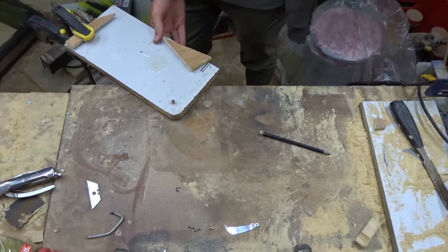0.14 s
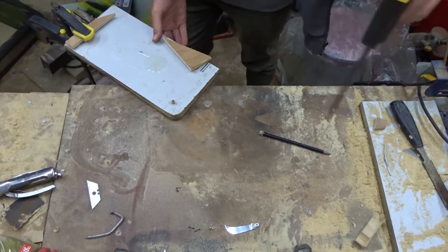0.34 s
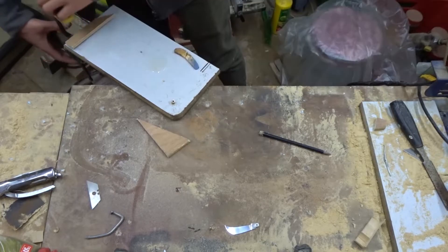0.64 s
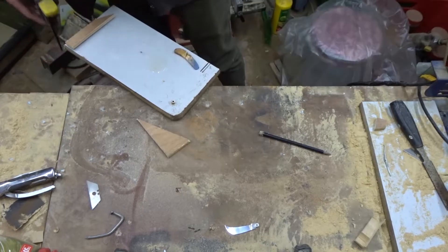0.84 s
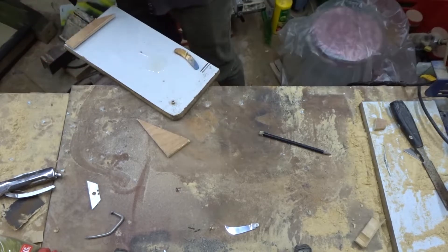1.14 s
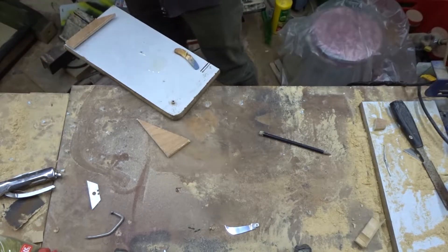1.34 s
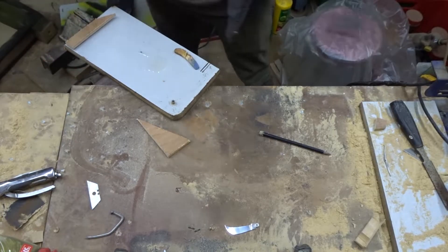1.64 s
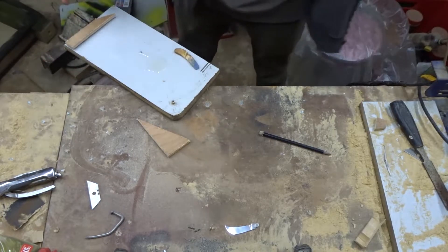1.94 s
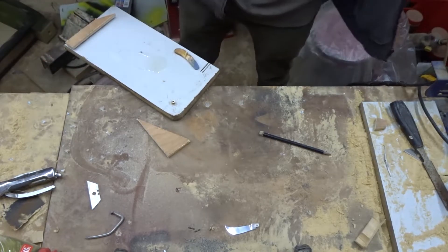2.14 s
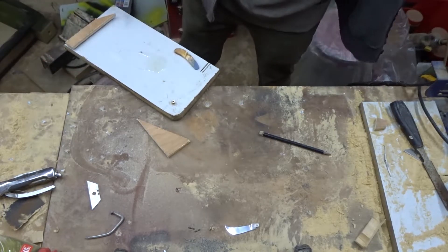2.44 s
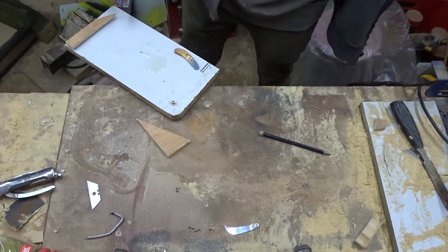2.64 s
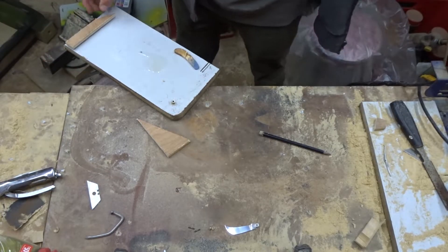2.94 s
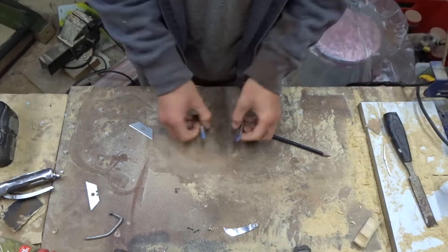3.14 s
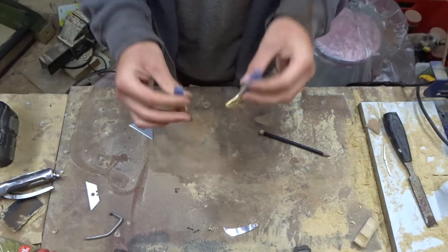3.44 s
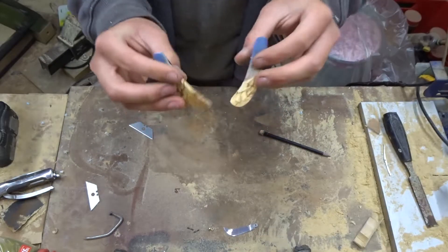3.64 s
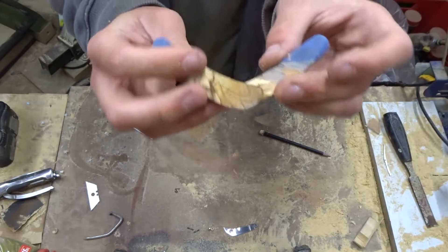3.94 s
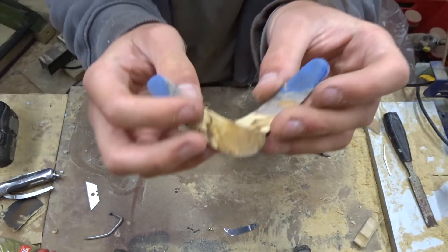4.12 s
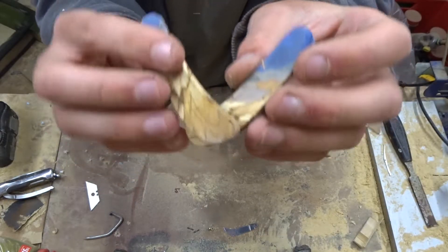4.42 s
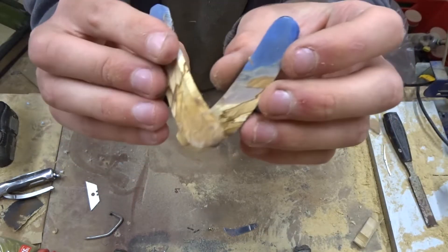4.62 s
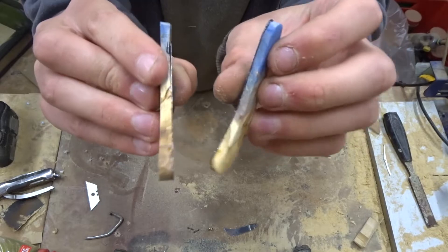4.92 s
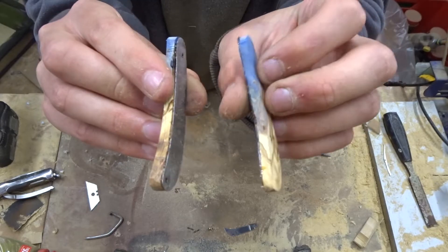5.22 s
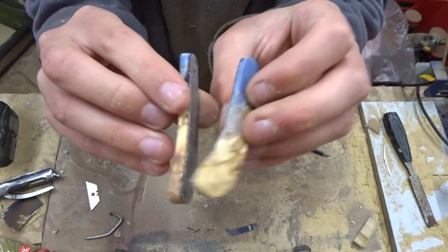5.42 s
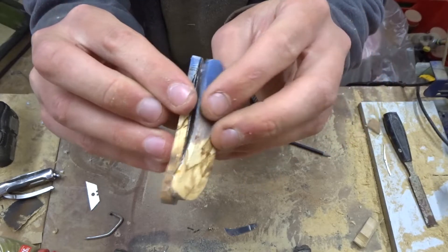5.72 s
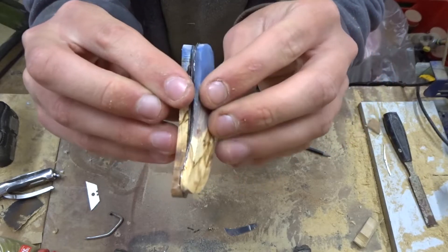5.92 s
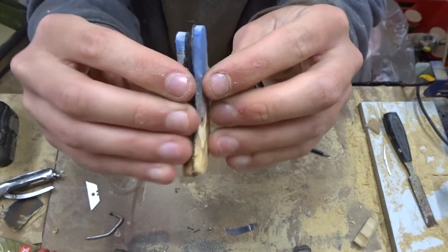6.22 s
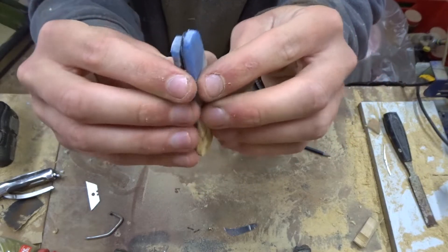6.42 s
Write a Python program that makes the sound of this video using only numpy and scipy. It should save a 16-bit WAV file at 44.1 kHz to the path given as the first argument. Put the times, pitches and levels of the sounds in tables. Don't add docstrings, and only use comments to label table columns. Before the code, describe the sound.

In a small workshop, a clamp lands with a hard clatter, wood slaps and thuds on a bench, then quiet handling and tiny clicks.

```python
import sys
import numpy as np
from scipy import signal
from scipy.fft import rfft, irfft, next_fast_len
from scipy.io import wavfile
from scipy.ndimage import uniform_filter1d

SR = 44100
rng = np.random.default_rng(int(sys.argv[2]) if len(sys.argv) > 2 else 0)


def natural_amplitude(level_db):
    exponent = np.asarray(level_db, float) / 20
    return 10 ** exponent


def store_wav(level_fs):
    pcm = np.round(np.clip(np.atleast_2d(level_fs), -1, 1) * 32767)
    wavfile.write(sys.argv[1], SR, pcm.T.astype(np.int16))


N = 289737
CUT_S = 3.185

# (f/Hz, width/Hz, level/dB)
FLOOR_BODY = ([(15, -51), (25, -38), (91, 5), (226, -8.5), (350, -27), (681, -16), (1200, -18),
               (1900, -88)], [(76, 8.9, 5.5), (110.7, 6.1, 1.5), (159, 21, -3.5), (355, 29, -9)])
# (f/Hz, width/Hz, level/dB)
BUMPED_BODY = ([(180, -20.5), (300, -3), (740, -10), (999, -2), (1120, -14), (1320, -2), (6000, -16.5),
                (9000, -73.5)], [(840, 63, -18), (1300, 35, -7)])
# (f/Hz, width/Hz, level/dB)
CLAMP_BODY = ([(200, -39.5), (800, -8), (1370, -8), (2830, -3.5), (7140, -14.5), (11000, -22)],
               [(1010, 76, -4), (1909, 180, -2), (2230, 24, -4), (2720, 57, 0.5), (3000, 88, -8.5),
               (4030, 95, -5), (4460, 75, -10), (5230, 43, -15.5), (5870, 96, -13.5), (7600, 39, -13)])
# (f/Hz, width/Hz, level/dB)
FACE_BODY = ([(880, -45), (1500, -8), (1860, -1), (4590, 0), (10000, -7)], [(3970, 71, 2.4),
              (4430, 44, 2.5)])


def evened(x):
    return x / np.sqrt(np.mean(x ** 2) + 1e-20)


def read(points, hz):
    f, value = np.transpose(points)
    return np.interp(np.log(hz + 1), np.log(f + 1), value)


def add(mix, s, sound):
    part = mix[:, round(s * SR):][:, :sound.shape[1]]
    part += sound[:, :part.shape[1]]


def response(body, ring_db, loss=0.19):
    colour, modes = body
    hz = np.fft.rfftfreq(16384, 1 / SR)
    power = natural_amplitude(read(colour, hz)) ** 2
    for f, width, db in modes:
        offset = 2 * (hz - f) / max(width, loss * f)
        power = power + natural_amplitude(db + ring_db) ** 2 / (1 + offset ** 2) ** 1.6
    log_gain = np.log(power + 1e-12) / 2
    mirrored = np.r_[log_gain, log_gain[-2:0:-1]]
    phase = -signal.hilbert(mirrored).imag[:len(hz)]
    taps = irfft(np.exp(log_gain + 1j * phase))[:8000]
    return taps / np.linalg.norm(taps)


def contacts(count, per_s, spread_db, grit):
    chance, size = rng.random(count), rng.exponential(1, count)
    sign, noise = np.sign(rng.random(count) - 0.5), rng.standard_normal(count)
    clicks = (chance < per_s / SR) * natural_amplitude(spread_db * np.minimum(size, 3)) * sign
    return evened(evened(clicks) + grit * noise)


def knocks(events, body, ring_db, per_s, blow, grit, contact_ms, soften=0.091, pan_db=0, wander_db=0,
           lag_samples=0, loss=0.084, rise_ms=0.029, detune=0):
    taps = response(body, ring_db, loss)
    out = np.zeros((2, N))
    t = np.arange(13000) / SR
    hardest_db = max(row[1] for row in events)
    for s, db, t60 in events:
        fade = natural_amplitude(-60 * t / np.clip(t60, 0.003, 0.3))
        fade *= np.minimum(1000 * t / max(rise_ms, 0.01), 1)
        drive = contacts(len(t), per_s, 1.4, grit) * fade
        drive *= np.linalg.norm(fade) / np.linalg.norm(drive)
        drive[0] += blow
        touch_ms = max(contact_ms, 0.01) * natural_amplitude(soften * (hardest_db - db))
        touch = signal.butter(2, min(500 / touch_ms, SR / 2.2), fs=SR)
        drive = signal.lfilter(*touch, drive)
        corner = rng.standard_normal()
        at = np.arange(len(taps))
        ring = np.interp(at * (1 + detune * corner), at, taps)
        sound = signal.fftconvolve(drive, ring) * natural_amplitude(db - 9.5)
        side_db = pan_db + wander_db * corner
        add(out, s, sound * evened(natural_amplitude(np.array([[side_db / 2], [-side_db / 2]]))))
    size = next_fast_len(N)
    delay = np.exp(-1j * np.pi * np.fft.rfftfreq(size) * lag_samples)
    return irfft(rfft(out, size) * [delay, 1 / delay], size)[:, :N]


def pressure(strokes):
    t = np.arange(N) / SR
    total = np.zeros(N)
    for s, db, rise, hold, fall in strokes:
        ahead = np.maximum(s - t, 0) / max(rise, 0.001)
        past = np.maximum(t - s - hold, 0) / max(fall, 0.001)
        total += natural_amplitude(db - 30 * (ahead + past))
    return total


def rubbing(strokes, body, ring_db, per_s, grit, spread_db=9.5, loss=0.19):
    drive = contacts(N, per_s, spread_db, grit) * pressure(strokes)
    return np.tile(signal.oaconvolve(drive, response(body, ring_db, loss))[:N], (2, 1))


def shop(x, wet_db):
    # f/Hz, t60/s
    decay = [(100, 0.57), (500, 0.26), (2000, 0.22), (5000, 0.18), (10000, 0.12)]
    taps = np.zeros((2, SR // 2))
    at = np.arange(60, SR // 2 - 20, 20)
    at = at + rng.integers(0, 20, (2, len(at)))
    np.put_along_axis(taps, at, rng.choice([-1., 1.], at.shape), 1)
    hz, t, z = signal.stft(taps, SR, nperseg=256)
    tail = signal.istft(z * natural_amplitude(-60 * t / read(decay, hz)[:, None]), SR, nperseg=256)[1]
    tail = tail / np.linalg.norm(tail[0])
    wet = natural_amplitude(wet_db) * signal.fftconvolve(x, tail, axes=1)[:, :N]
    side = 0
    for part, edge_hz, db in ((x, 1300, -0.5), (wet, 1500, 3.5)):
        high = signal.butter(1, edge_hz, "high", fs=SR)
        side = side + natural_amplitude(db) * signal.lfilter(*high, part[0] - part[1]) / 2
    return (x + wet).mean(0) + np.array([side, -side])


def hush(colour, db):
    # f/Hz, correlation/1
    likeness = [(60, 0.94), (170, 0.89), (480, 0.31), (1360, -0.01), (3860, -0.0052), (10900, -0.13)]
    frames, hz = N // 256 + 5, np.fft.rfftfreq(1024, 1 / SR)
    a, b, c, d, patches = rng.standard_normal((frames, 513, 5)).T
    patches = evened(uniform_filter1d(uniform_filter1d(patches, 12, 0), 20, 1))
    same = np.clip(read(likeness, hz), -1, 1)[:, None]
    left = a + 1j * b
    z = np.array([left, same * left + np.sqrt(1 - same ** 2) * (c + 1j * d)])
    z *= natural_amplitude(read(colour, hz)[:, None] + 1.3 * patches)
    return natural_amplitude(db) * evened(signal.istft(z, nperseg=1024, noverlap=768)[1][:, :N])


def hush_before():
    # f/Hz, level/dB per Hz
    colour_before = [(35, -25.5), (60, -3), (196, -9.5), (394, -9), (1280, -16), (1600, -14), (3440, -18),
                     (10500, -26), (11200, -33.5)]
    return hush(colour_before, -62.5)


def hush_after():
    # f/Hz, level/dB per Hz
    colour_after = [(20, -2.5), (69, -4), (115, -14.5), (398, -9), (577, -14), (1150, -18), (1460, -13.5),
                    (2750, -19), (4670, -20), (11200, -29)]
    stir_db = 4 * np.exp(-abs(np.arange(N) / SR - CUT_S) / 0.5)
    return hush(colour_after, -64.5) * natural_amplitude(stir_db)


def tripod_sway():
    # t/s, level/dB, rise/s, hold/s, fall/s
    sways = [
        (0.001, -64.5, 0.11, 0.026, 0.31),
        (0.51, -59, 0.23, 0.028, 0.79),
        (1.61, -62, 0.19, 0.093, 0.28),
        (2.31, -62, 0.063, 0.34, 0.68),
        (2.76, -52.5, 0.49, 0.036, 1),
    ]
    # (f/Hz, width/Hz, level/dB)
    tripod = ([(12, -19.5), (30, -1), (60, 1), (85, -1), (150, -34), (400, -81)], [(48, 18, -1.5)])
    return rubbing(sways, tripod, ring_db=-5.5, per_s=570, grit=2.7)


def footsteps():
    # t/s, level/dB, t60/s
    soles = [
        (1.546, -36.5, 0.24),
        (1.612, -42, 0.061),
        (1.635, -48, 0.073),
        (1.656, -34, 0.083),
        (1.689, -38, 0.14),
        (1.746, -55, 0.12),
    ]
    # t/s, level/dB, t60/s
    heels = [
        (1.545, -39, 0.052),
        (1.575, -46, 0.095),
    ]
    # (f/Hz, width/Hz, level/dB)
    heel_body = ([(30, -31), (90, 0), (250, -4), (380, -7), (600, -29), (1500, -63)], [(286, 56, 2.4)])
    steps = knocks(soles, FLOOR_BODY, ring_db=6.0, per_s=200, blow=20, grit=0.32, contact_ms=0.99)
    return steps + knocks(heels, heel_body, ring_db=1.5, per_s=360, blow=12.0, grit=0.39, contact_ms=1.36)


def shoe_scuffs():
    # t/s, level/dB, rise/s, hold/s, fall/s
    scuffs = [
        (1.66, -64, 0.23, 0.017, 0.2),
        (2.034, -67, 0.2, 0.032, 0.042),
    ]
    return rubbing(scuffs, BUMPED_BODY, ring_db=-11, per_s=3000, grit=0.56)


def weight_shifts():
    # t/s, level/dB, rise/s, hold/s, fall/s
    shifts = [
        (4.3, -72, 0.15, 0.011, 0.11),
        (4.43, -70, 0.11, 0.13, 0.084),
    ]
    return rubbing(shifts, FLOOR_BODY, ring_db=3, per_s=220, grit=0.35)


def bench_frame():
    # t/s, level/dB, t60/s
    thumps = [
        (2.434, -15, 0.04),
        (2.5, -27.5, 0.1),
        (2.57, -29.5, 0.13),
        (2.8, -32, 0.19),
        (2.94, -17, 0.038),
        (2.998, -31, 0.27),
        (3.089, -25.5, 0.04),
        (3.15, -36, 0.094),
    ]
    # t/s, level/dB, rise/s, hold/s, fall/s
    shakes = [
        (0.44, -55, 0.02, 0.077, 0.39),
        (1.3, -62.5, 0.15, 0.047, 0.13),
        (1.872, -64.5, 0.028, 0.0054, 1),
        (2.26, -32.5, 0.0093, 0.12, 0.15),
        (2.4, -46, 0.028, 0.033, 0.63),
        (2.72, -44, 0.067, 0.072, 0.15),
        (2.868, -32.5, 0.014, 0.014, 0.091),
        (2.93, -50, 0.069, 0.047, 0.89),
    ]
    # (f/Hz, width/Hz, level/dB)
    bench_body = ([(35, -32.5), (60, -5.5), (103, 2.5), (162, -10.5), (334, -3), (518, -8.5), (709, -13.5),
                   (1200, -24), (1900, -78)], [(107, 15, -0.5), (186, 25, -9.5), (310, 21, -5.5),
                   (349.5, 15, -2), (570, 9.7, -15.5), (657, 30, -16.5), (743, 35, -17.5)])
    thuds = knocks(thumps, bench_body, ring_db=4.0, per_s=1100, blow=7.2, grit=0.7, contact_ms=3.2)
    return thuds + rubbing(shakes, bench_body, ring_db=7.5, per_s=1600, grit=1.3, spread_db=4.5, loss=0.07)


def block_knock():
    # t/s, level/dB, t60/s
    block_blows = [
        (0.4245, -31, 0.084),
        (0.435, -27.5, 0.031),
        (0.4385, -31, 0.05),
        (0.445, -35, 0.063),
        (0.451, -32, 0.089),
        (0.459, -37, 0.06),
        (0.4635, -38, 0.046),
        (0.469, -35, 0.019),
        (0.476, -38, 0.097),
    ]
    # (f/Hz, width/Hz, level/dB)
    block = ([(100, -4.5), (429, -8), (715, -0.5), (870, 3.5), (2070, -1), (3960, -1), (11000, -20)],
              [(500, 26, 10), (857, 79, 7), (1250, 81, 3.5), (2240, 60, -10), (3200, 90, -2),
              (3590, 120, 2), (3930, 150, 5.5), (5350, 120, -6.5)])
    return knocks(block_blows, block, loss=0.048, ring_db=4.5, detune=0.006, rise_ms=0.35, per_s=3200,
                  blow=2.2, grit=0.85, contact_ms=0.022, soften=0.3, pan_db=-0.5, lag_samples=-0.9)


def clamp_skid():
    # t/s, level/dB, t60/s
    hops = [
        (0.866, -45.5, 0.06),
        (0.8745, -28.5, 0.019),
        (0.8775, -25, 0.03),
        (0.893, -33, 0.14),
        (0.91, -35, 0.17),
        (0.931, -27, 0.084),
        (0.938, -27.5, 0.13),
        (0.954, -26.5, 0.18),
        (0.9745, -23.5, 0.067),
    ]
    # (f/Hz, width/Hz, level/dB)
    skid_body = ([(200, -29), (600, -8.5), (1000, -4), (1500, -8), (2300, -5), (4200, -7), (7140, -16.5),
                  (11000, -22.5)], [(1000, 81, -0.5), (1730, 120, -3.5), (2300, 100, 0), (3356, 60, 1),
                  (4050, 120, -4.5), (4760, 80, -8), (5557, 80, -10.5)])
    return knocks(hops, skid_body, loss=0.04, ring_db=1.5, detune=0.013, rise_ms=1.5, per_s=4000,
                  blow=1.2, grit=1.0, contact_ms=0.068, soften=0.15, pan_db=2.0, lag_samples=-2.5)


def clamp_drag():
    # t/s, level/dB, rise/s, hold/s, fall/s
    drags = [
        (0.878, -59, 0.02, 0.03, 0.2),
        (0.98, -37, 0.12, 0.0046, 0.013),
        (1.15, -61, 0.078, 0.15, 0.05),
        (2.694, -58, 0.29, 0.0047, 0.036),
    ]
    return rubbing(drags, CLAMP_BODY, ring_db=-9.5, per_s=9600, grit=0.98)


def clamp_landing():
    # t/s, level/dB, t60/s
    clamp_blows = [(0.9845, -13, 0.03), (0.9875, -10, 0.025), (0.9918, -0.5, 0.016), (0.998, -4.5, 0.025),
                   (1.001, -6, 0.025), (1.009, -7, 0.018), (1.0125, -10, 0.02), (1.0168, -6.5, 0.028),
                   (1.024, -10.5, 0.016), (1.029, -10.5, 0.037), (1.0355, -13.5, 0.045),
                   (1.04, -21.5, 0.04), (1.046, -18, 0.021), (1.053, -30.5, 0.044), (1.066, -43, 0.023)]
    return knocks(clamp_blows, CLAMP_BODY, loss=0.066, ring_db=2.5, detune=0.037, rise_ms=0.15, per_s=2700,
                  blow=1.7, grit=0.78, contact_ms=0.023, soften=0.32, pan_db=0.5, lag_samples=-1.67)


def clamp_closing():
    # t/s, level/dB, t60/s
    jaw_blows = [
        (1.271, -27, 0.025),
        (1.2755, -23.5, 0.033),
        (1.2828, -39, 0.033),
        (1.2915, -24.5, 0.068),
        (1.2995, -27, 0.04),
        (1.305, -29, 0.024),
    ]
    # (f/Hz, width/Hz, level/dB)
    jaw_body = ([(800, -12), (1700, -23), (2300, -9), (3050, -1.5), (4480, -7), (5500, -13.5),
                 (11000, 0.5)], [(2900, 150, -2), (3350, 150, -1), (4200, 120, -10), (5000, 60, 0)])
    # t/s, level/dB, t60/s
    snaps = [
        (1.33, -33.5, 0.025),
        (1.3328, -29.5, 0.018),
        (1.338, -41.5, 0.042),
        (1.343, -45, 0.034),
        (1.349, -38.5, 0.081),
    ]
    # (f/Hz, width/Hz, level/dB)
    snap_body = ([(200, -8), (900, -7), (1500, -10), (2500, 1.5), (4000, -5.5), (6000, -14), (11000, -9)],
                  [(960, 180, 4.5), (2300, 200, -5), (3300, 250, -2), (5200, 250, -5)])
    jaws = knocks(jaw_blows, jaw_body, ring_db=-7.0, per_s=2300, blow=1.5, grit=0.87, contact_ms=0.067,
                  pan_db=0.5, lag_samples=-1.84)
    return jaws + knocks(snaps, snap_body, ring_db=-0.5, per_s=2200, blow=1.7, grit=0.78, contact_ms=0.047,
                         pan_db=1.0, lag_samples=-1.5)


def board_drop():
    # t/s, level/dB, t60/s
    board_blows = [(2.257, -13, 0.02), (2.2602, -6.5, 0.04), (2.266, -8.5, 0.032), (2.2725, -7.5, 0.018),
                   (2.279, -4, 0.022), (2.2835, -8, 0.02), (2.2865, -11, 0.017), (2.2975, -13, 0.013),
                   (2.3008, -6, 0.024), (2.306, -18, 0.033), (2.3155, -19, 0.025), (2.3215, -15.5, 0.021),
                   (2.327, -15.5, 0.033), (2.3415, -11, 0.013), (2.3442, -4.5, 0.013),
                   (2.3565, -13.5, 0.016)]
    # (f/Hz, width/Hz, level/dB)
    board = ([(59, -45.5), (100, -9), (1120, -5), (2150, -5), (4300, -17.5), (11000, -29.5)],
              [(434, 54, -2.5), (786, 19.1, 4.5), (1248, 41, 5), (1337, 83, 1.5), (1720, 56, -7.5),
              (1830, 41, -14.5), (2530, 106, 2.5), (2596, 150, -3), (2798, 85, -6.5), (3440, 67, -10.5),
              (3704, 110, -9), (5053, 77, -21.5)])
    # t/s, level/dB, t60/s
    settling = [(2.289, -13.5, 0.3), (2.31, -19.5, 0.27), (2.337, -8.5, 0.038), (2.348, -16, 0.065),
                (2.367, -16, 0.023), (2.373, -16, 0.027), (2.381, -33, 0.036), (2.387, -24.5, 0.043),
                (2.399, -32, 0.057), (2.404, -36, 0.04), (2.411, -32, 0.051), (2.439, -41, 0.43)]
    # (f/Hz, width/Hz, level/dB)
    lying_board = ([(59, -13), (100, -11.5), (145, -14), (388, -4), (564, -2.5), (923, -5.5), (2670, -11.5),
                    (11000, -32)], [(355, 15, 4), (558, 16, 5), (1193, 59, -12), (1790, 120, -13.5),
                    (2448, 100, -2.5), (2700, 60, -8)])
    drop = knocks(board_blows, board, loss=0.016, ring_db=7.5, detune=0.003, rise_ms=0.41, per_s=2800,
                  blow=4, grit=0.94, contact_ms=0.046, pan_db=-6.0, wander_db=5, lag_samples=1.4)
    return drop + knocks(settling, lying_board, loss=0.026, ring_db=-1.5, detune=0.011, rise_ms=1.5,
                         per_s=1400, blow=3.4, grit=0.58, contact_ms=0.045, pan_db=-4.5, wander_db=7,
                         lag_samples=2.1)


def offcut_drop():
    # t/s, level/dB, t60/s
    offcut_blows = [(1.864, -43, 0.067), (1.868, -40.5, 0.095), (1.889, -39.5, 0.16), (2.703, -27, 0.036),
                    (2.7102, -21, 0.025), (2.7132, -19, 0.024), (2.717, -18, 0.023), (2.7225, -36.5, 0.069),
                    (2.7295, -23, 0.036), (2.735, -26.5, 0.055), (2.7425, -28.5, 0.078)]
    # (f/Hz, width/Hz, level/dB)
    offcut = ([(60, -35), (120, -5), (250, 0.5), (500, -1), (1200, -6), (2200, -10.5), (3200, -18.5),
               (4200, -25), (11000, -22)], [(205.5, 38, -8), (283, 40, 3.5), (347, 34, -2.5),
               (569.4, 18, -5.5), (1080, 51, -5.5), (1207, 43, -10.5), (1640, 79, -17), (2540, 90, -16)])
    # t/s, level/dB, t60/s
    flops = [
        (2.7535, -31, 0.034),
        (2.7585, -25, 0.053),
        (2.7705, -31, 0.055),
        (2.779, -25.5, 0.065),
        (2.7875, -35, 0.057),
        (2.798, -34, 0.07),
        (2.81, -41, 0.084),
    ]
    # (f/Hz, width/Hz, level/dB)
    flat_offcut = ([(60, -20), (120, -18), (220, -24), (400, 0.5), (900, -1.5), (1300, -14), (2200, -17),
                    (4200, -23), (11000, -23)], [(330, 37, -6), (860, 60, -7), (1230, 80, -11),
                    (2100, 120, -15)])
    drop = knocks(offcut_blows, offcut, loss=0.053, ring_db=5.5, detune=0.026, rise_ms=0.46, per_s=2200,
                  blow=6.6, grit=1.0, contact_ms=0.1, soften=0.081, pan_db=-5.0, lag_samples=2.1)
    return drop + knocks(flops, flat_offcut, ring_db=5.0, detune=0.02, rise_ms=2.5, per_s=5200, blow=0.8,
                         grit=1.0, contact_ms=0.15, lag_samples=0.96)


def handle_drop():
    # t/s, level/dB, t60/s
    handle_blows = [
        (2.8652, -11, 0.013),
        (2.8692, -9.5, 0.023),
        (2.877, -12, 0.032),
        (2.8855, -25, 0.03),
        (2.8895, -22, 0.038),
        (2.901, -22.5, 0.053),
        (2.907, -21, 0.022),
        (2.9135, -35, 0.047),
        (2.9215, -31.5, 0.11),
    ]
    # (f/Hz, width/Hz, level/dB)
    handle = ([(59, -21), (100, -9), (157, -7.5), (388, 1.5), (482, -15), (729, -6), (1040, -5.5),
               (3380, -8), (11000, -33.5)], [(344, 17, 7.5), (397.5, 23, 8.5), (667, 33, 8.5), (706, 22, 1),
               (2590, 90, -5.5), (2840, 99, 2.5), (3170, 90, -9), (3470, 230, 4), (4040, 160, -5.5),
               (5400, 220, -15)])
    return knocks(handle_blows, handle, loss=0.051, ring_db=2.5, detune=0.039, rise_ms=0.25, per_s=2600,
                  blow=2.3, grit=0.56, contact_ms=0.026, pan_db=-2.5, wander_db=3.0, lag_samples=2.0)


def bench_bumps():
    # t/s, level/dB, t60/s
    bumps = [
        (4.084, -55.5, 0.089),
        (4.109, -54.5, 0.12),
        (4.42, -51, 0.068),
        (4.431, -48, 0.075),
        (4.451, -51, 0.072),
    ]
    # t/s, level/dB, t60/s
    nudges = [
        (4.472, -53, 0.045),
        (4.48, -44.5, 0.047),
        (4.493, -50, 0.11),
    ]
    # (f/Hz, width/Hz, level/dB)
    nudged_body = ([(180, -24), (400, -1), (1100, -14), (2500, -15), (6000, -35), (9000, -61)],
                    [(620, 29, 1), (856, 58, -9), (1280, 28, 0.5), (2470, 83, -15)])
    bumped = knocks(bumps, BUMPED_BODY, ring_db=-3.5, per_s=1400, blow=0.38, grit=0.8, contact_ms=0.18,
                    lag_samples=1.36)
    return bumped + knocks(nudges, nudged_body, loss=0.041, ring_db=3, per_s=3000, blow=1.6, grit=0.68,
                           contact_ms=0.18, lag_samples=1.4)


def finger_strokes():
    # t/s, level/dB, rise/s, hold/s, fall/s
    brushes = [
        (0.21, -74, 0.038, 0.11, 0.03),
        (1.37, -76, 0.05, 0.037, 0.33),
    ]
    return rubbing(brushes, FACE_BODY, ring_db=4.0, per_s=3600, grit=0.74)


def slab_slide():
    # t/s, level/dB, rise/s, hold/s, fall/s
    slides = [
        (3.186, -68, 0.00091, 0.0043, 0.072),
        (3.187, -61.5, 0.0014, 0.14, 0.29),
    ]
    # (f/Hz, width/Hz, level/dB)
    sliding_body = ([(120, -30.5), (200, 1.5), (556, -1), (832, -7), (1090, -6.5), (1960, 0.5), (2390, -7),
                     (11000, -11.5)], [(547, 140, -2), (823, 62, -2.5), (2000, 280, -4), (2670, 270, -8),
                     (4710, 670, -8), (8600, 600, -19.5)])
    return rubbing(slides, sliding_body, ring_db=8.0, per_s=3700, grit=1.8)


def slab_faces():
    # t/s, level/dB, rise/s, hold/s, fall/s
    face_strokes = [
        (5.21, -90, 0.051, 0.4, 0.12),
        (5.64, -82, 0.24, 0.406, 0.054),
    ]
    # t/s, f/Hz, level/dB, hold/s
    squeaks = [
        (5.72, 4430, -88, 0.3),
        (5.87, 3700, -82, 0.17),
    ]
    waver, flicker = (evened(row) for row in uniform_filter1d(rng.standard_normal((2, N)), 1500))
    tones = np.zeros(N)
    for s, hz, db, hold in squeaks:
        phase = 2 * np.pi * np.cumsum(hz * (1 + 0.00105 * waver)) / SR
        tones += np.sin(phase) * pressure([(s, db, 0.12, hold, 0.055)])
    rub = rubbing(face_strokes, FACE_BODY, ring_db=9.0, per_s=1500, grit=1.0)
    return rub + np.tile(tones * natural_amplitude(2.6 * flicker), (2, 1))


def slab_ticks():
    # t/s, level/dB, t60/s
    touches = [
        (5.4945, -34.5, 0.012),
        (5.7584, -40, 0.03),
    ]
    # (f/Hz, width/Hz, level/dB)
    touched_body = ([(800, -10.5), (2200, -4), (3710, -4), (4830, -1), (6720, -16.5), (11000, -8)],
                     [(1500, 135, 0.5), (2294, 200, 1.5), (2710, 164, 2)])
    # t/s, level/dB, t60/s
    ticks = [
        (6.2762, -22.5, 0.007),
        (6.2825, -53, 0.05),
        (6.292, -45, 0.22),
    ]
    # (f/Hz, width/Hz, level/dB)
    slabs = ([(500, -31), (1390, -14), (2180, -17.5), (2870, -7), (5400, -6.5), (7370, -0.5), (8280, -13),
              (11000, -4.5)], [(1450, 110, -5), (2910, 320, 5.5), (3650, 460, 6), (5870, 220, -3),
              (6800, 400, -9), (7600, 450, -1), (10200, 430, 2)])
    # t/s, level/dB, t60/s
    clinks = [
        (6.552, -39, 0.01),
        (6.5535, -40.5, 0.0091),
        (6.555, -31.5, 0.005),
    ]
    # (f/Hz, width/Hz, level/dB)
    edge_body = ([(800, -20), (2000, -10.5), (5000, -11), (8500, -12), (11000, -16.5)], [(2400, 210, -3),
                  (4700, 250, -11.5), (7230, 1300, 3), (10900, 330, -5)])
    sound = knocks(touches, touched_body, ring_db=3.5, per_s=3080, blow=4.2, grit=0.32, contact_ms=0.063,
                   soften=1.4, pan_db=-4.0, lag_samples=0.67)
    sound += knocks(ticks, slabs, loss=0.04, ring_db=-1.0, per_s=4300, blow=5.1, grit=0.56,
                    contact_ms=0.024, soften=0.089, pan_db=-2.0, lag_samples=0.8)
    sound += knocks(clinks, edge_body, ring_db=-2.5, per_s=9000, blow=2.0, grit=0.8, contact_ms=0.05,
                    pan_db=-1.5, lag_samples=0.9)
    return sound


def scene():
    clamp_side = block_knock() + clamp_skid() + clamp_landing() + clamp_closing()
    clamp_side += clamp_drag() + shoe_scuffs()
    board_side = board_drop() + offcut_drop() + handle_drop()
    shaking = bench_frame() + footsteps() + tripod_sway()
    first = shop(clamp_side, wet_db=-3.5) + shop(board_side, wet_db=-6.0) + shaking + hush_before()

    close = slab_ticks() + bench_bumps()
    second = shop(close, wet_db=-9) + hush_after() + weight_shifts()

    strokes = slab_slide() + finger_strokes() + slab_faces()
    before = np.arange(N) < CUT_S * SR
    return np.where(before, first, second) + natural_amplitude(6.5) * shop(strokes, wet_db=-1.5)


def low_pass(x):
    return signal.sosfilt(signal.butter(12, 11520, fs=SR, output="sos"), x)


def record(dry):
    edge = signal.firwin(1023, 11150, window=("kaiser", 9), fs=SR)
    mix = signal.oaconvolve(dry, edge[None], "same")
    return low_pass(mix)


dry = scene()
out = record(dry)
store_wav(out)
```